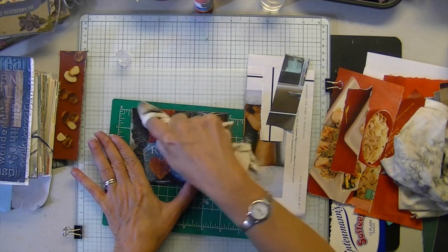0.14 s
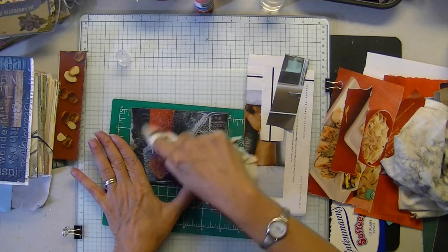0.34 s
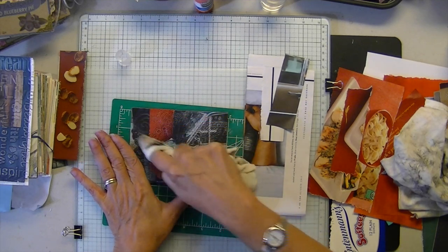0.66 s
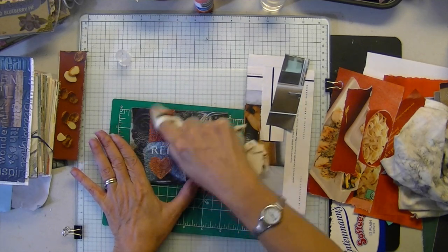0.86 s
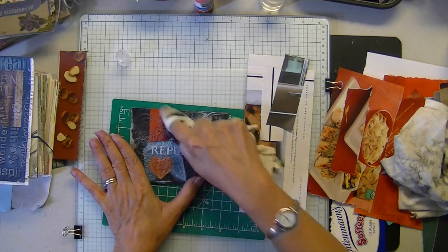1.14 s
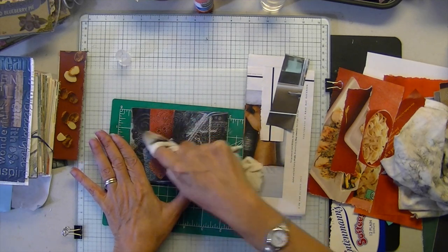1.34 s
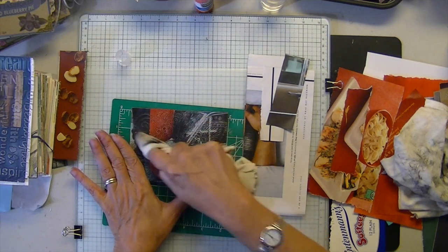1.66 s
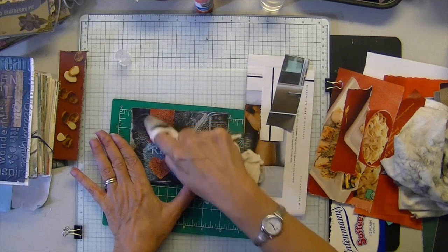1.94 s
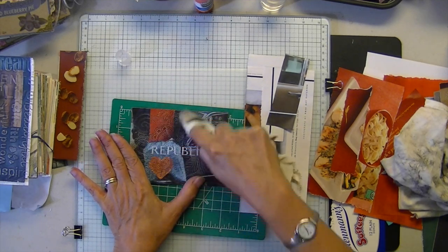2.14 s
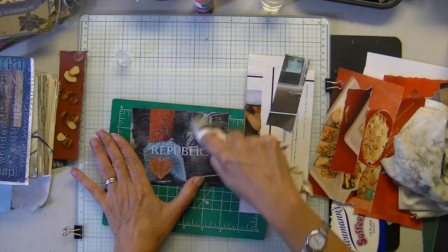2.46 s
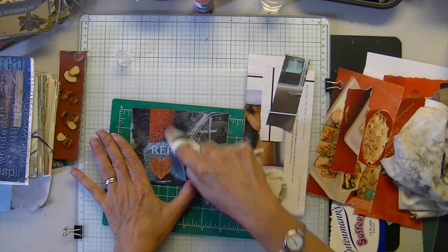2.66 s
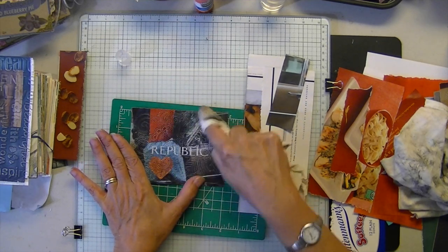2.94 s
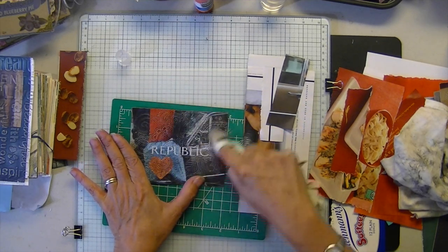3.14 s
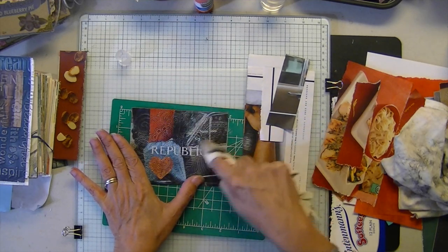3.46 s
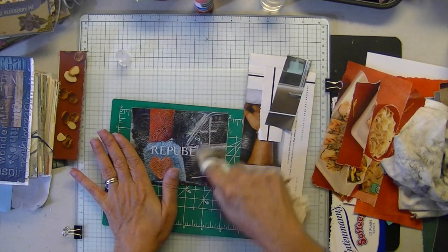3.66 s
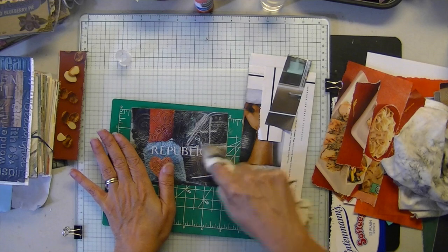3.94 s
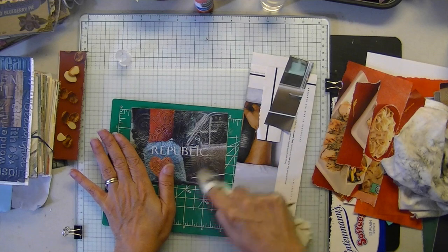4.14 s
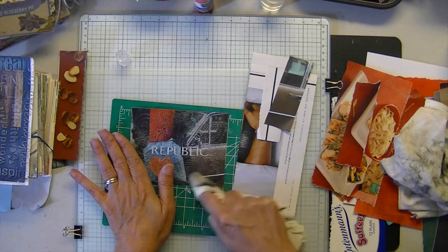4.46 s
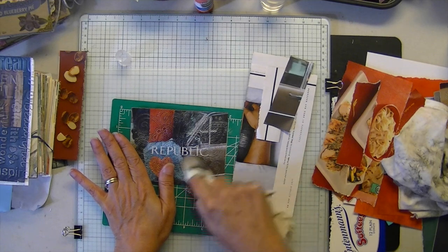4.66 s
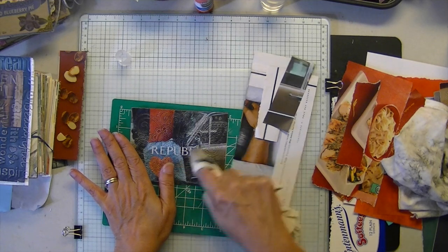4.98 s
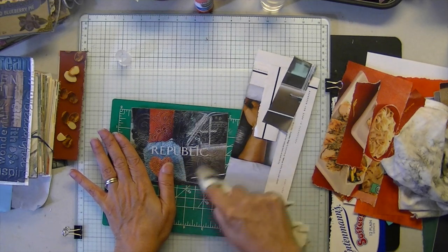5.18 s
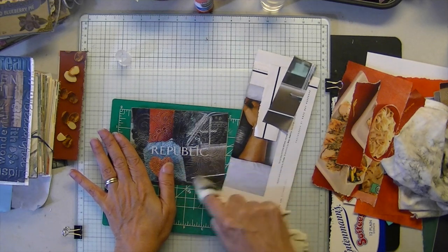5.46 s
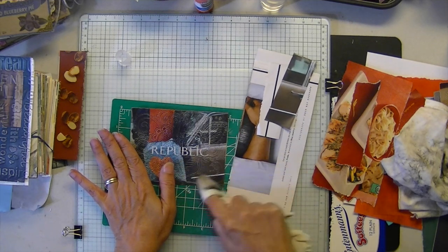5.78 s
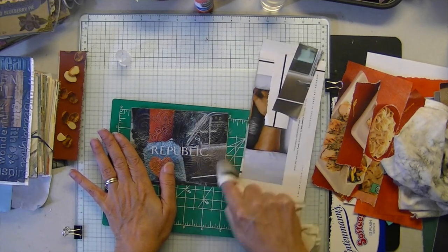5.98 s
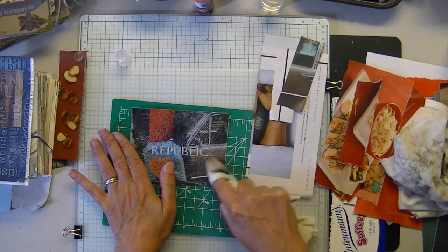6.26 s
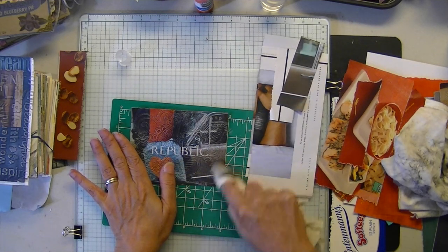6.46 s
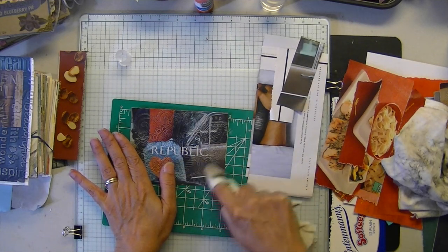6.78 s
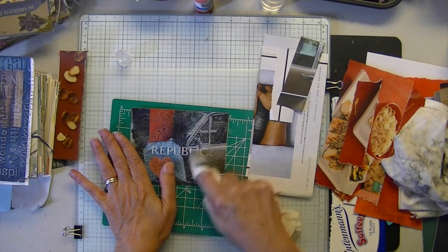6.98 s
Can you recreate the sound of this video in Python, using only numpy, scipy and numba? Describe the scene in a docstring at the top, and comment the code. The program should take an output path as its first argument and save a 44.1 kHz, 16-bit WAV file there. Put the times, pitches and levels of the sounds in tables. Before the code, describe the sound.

Quick, bright, hissing rubs of wet cloth on a slick sheet, six or so a second, with crisp paper cracks over quiet appliance hum.

```python
"""A small room: a damp cloth over a fingertip scrubs to and fro on glossy paper, six or seven strokes a second.
Fibres slip in dense tiny grains: a bright hiss plus two blurred resonances of sheet and cloth that move
from stroke to stroke; now and then a thin whistle or a coarse catch.
Metal at the wrist ticks and the sheet snaps, both as struck decaying modes; the hand bears down in dull swells.
A faint appliance hum of sines and banded air noise lie below."""
import sys
import numpy as np
from scipy import signal
from scipy.io import wavfile
from scipy.ndimage import uniform_filter1d
from numba import njit

SR = 44100
rng = np.random.default_rng(int(sys.argv[2]) if len(sys.argv) > 2 else 0)


def dump(signal):
    """Clip the signal to [-1, 1] and save it as 16-bit WAV at the path in sys.argv[1]."""
    limited = np.clip(np.atleast_2d(signal).T, -1, 1)
    pcm = np.round(limited * 32767).astype(np.int16)
    wavfile.write(sys.argv[1], SR, pcm)


N = 314080

# mean slip rate; size unit of the exponential spread
SLIPS_PER_S, SLIP_SPREAD_DB = 4000, 0.5
HISS_WIDTH_HZ, RASP_WIDTH_HZ, SCUFF_WIDTH_HZ = 1800, 600, 300   # of each of two passes
HISS_BROAD_RE_RESONANCE_DB = 1
# floors between strokes, before the turn drag
REST_HISS_DB, REST_RASP_DB, REST_SCUFF_DB = -79, -79.5, -78.5
GLIDE_S = 0.04   # a glide runs this long either side of mid-stroke
# table top under the scuff: level before following, share of the scuff's dB swing
TABLE_DB, TABLE_FOLLOWS, TABLE_LOW_HZ, TABLE_HIGH_HZ = -67.5, 0.33, 430, 1260
SNAGS_PER_S, SNAG_MEAN_DB, SNAG_DECAY_S = 250, -8, 0.002   # mean jump re steady grip
WHISTLE_T60_S, WHISTLE_EDGE_S = 0.012, 0.012   # t60 of one pass
WHISTLE_FLICKER_DB, WHISTLE_FLICKER_HZ = 2.5, 40
CATCH_SIGMA_S, CATCH_T60_CYCLES = 0.0099, 11
RISE_S = 0.00088   # from first contact to full blow
SNAP_LOW_T60_S = 0.008
RUSTLE_DB, RUSTLE_T60_S, RUSTLE_LOW_HZ, RUSTLE_HIGH_HZ = -21.5, 0.094, 2200, 11100   # level re snap
VALLEY_LOW_HZ, VALLEY_HIGH_HZ = 3750, 4600   # the sheet is dead between low pop and crack
PUSH_SIGMA_S, PUSH_T60_S = 0.019, 0.018
AIR_DB = -61
ROOM_BASS_T60_S, ROOM_DB, WALL_CUT_HZ = 0.2, -15.5, 8100
MIC_LOW_HZ, CUTOFF_HZ = 132, 15850

# strokes of the cloth: start_s, attack_s, hold_s, release_s,
#  hiss_db, hiss_hz (mid-stroke), hiss_glide_hz_per_s, top_re_hiss_db,
#  rasp_lag_s, rasp_re_hiss_db, rasp_hz, rasp_glide_hz_per_s, rasp_broad_re_resonance_db,
#  scuff_lag_s, scuff_re_hiss_db, scuff_hz, scuff_broad_re_resonance_db
STROKES = [(0.009, 0.012, 0.12, 0.011, -58.5, 10000, 8813, -14, -0.092, -6, 5400, -1800, -4, -0.033, -6, 1720, 0),
           (0.11, 0.0098, 0.0037, 0.016, -36, 9800, 2007, -15, -0.015, -3, 5750, 7204, 7, 0.011, -3.5, 1730, 3.5),
           (0.286, 0.017, 0.0092, 0.013, -40.5, 8700, -32300, -8, 0.021, -4.5, 5480, 304, 0, 0.029, -10, 3470, 2),
           (0.425, 0.013, 0.0027, 0.02, -35, 10600, -26400, -10, -0.0033, -3.5, 5800, 7200, 2, -0.011, -10, 3570, -2.5),
           (0.585, 0.0044, 0, 0.029, -39.5, 9800, 29200, -7, 0.019, -12.5, 6170, 5305, 16, 0.01, -15, 2760, 11),
           (0.8, 0.0083, 0.017, 0.013, -29.5, 10800, 18314, -7, -0.0022, -4.5, 5200, 26000, 8.5, 0.0097, -7.5, 2080, -3),
           (0.974, 0.011, 0.0, 0.025, -31.5, 9600, 19276, -11, 0.0045, -13.5, 6300, -10200, 2, -0.0072, -19.5, 3160, 11),
           (1.143, 0.016, 0.0024, 0.013, -36, 10600, 8690, -8, -0.0046, 0.5, 5070, 18000, 2, 0.0069, -5, 1860, 2),
           (1.344, 0.02, 0.012, 0.015, -35, 10400, 2700, -16.4, 0.007, -19.5, 5400, -13300, -2, -0.0052, -14.5, 3180, 6),
           (1.489, 0.028, 0.0027, 0.013, -40.5, 9600, -18200, -7, -0.0064, -3, 6170, 5094, 7, 0.0055, -5, 1990, 2),
           (1.671, 0.019, 0.0, 0.019, -33.5, 10450, -1500, -15, 0.015, -15, 4470, -2200, 2, 0.0073, -17, 3400, 1),
           (1.768, 0.013, 0.078, 0.012, -44.5, 10700, -1300, -12, 0.014, -2.5, 5300, 9202, 8, 0.055, -2, 2100, 6),
           (2.006, 0.018, 0.0, 0.012, -37.5, 9200, -27900, -12, 0.0023, -15, 7150, -15800, 12, 0.014, -12.5, 2880, 14),
           (2.094, 0.041, 0.029, 0.019, -51, 10100, -2900, -8, 0.02, -2, 4360, 4606, 2, 0.063, -3.5, 2160, 6),
           (2.208, 0.024, 0.00074, 0.011, -39.5, 8800, -13200, -13, -0.0029, -3, 5200, 2136, 10, -0.029, -13.5, 2410, 36),
           (2.34, 0.0086, 0.029, 0.013, -40, 10700, 24693, -9, -0.01, -13.5, 6100, 1709, 3, 0.0037, -8, 2520, 5),
           (2.41, 0.023, 0.099, 0.0046, -57.5, 9100, -9300, -4, -0.013, 0, 4560, 5102, 3.5, -0.0095, -7, 2200, 7),
           (2.525, 0.0078, 0.011, 0.014, -35.5, 9700, -15800, -10.4, -0.015, -0.5, 5550, 19102, -6, 0.0067, -10, 2750, 6),
           (2.717, 0.026, 0.0084, 0.024, -41, 9900, 13117, -6.5, -0.00073, -5, 6400, 302, 37, 0.018, -6.5, 2200, 5),
           (2.867, 0.027, 0.048, 0.013, -44, 9900, -12200, -10, -0.013, -1.5, 5800, 17120, -1, -0.0037, -8, 1820, 3),
           (3.05, 0.0074, 0.046, 0.018, -38.5, 9800, -12500, -6.5, 0.0046, -4, 6220, -2500, -1.5, 0.013, -7, 3030, 10),
           (3.207, 0.013, 0.005, 0.019, -33.5, 9400, -2400, -6, -0.0073, -3.5, 5900, 9912, -1, -0.018, -15.5, 1700, 18),
           (3.292, 0.022, 0.0, 0.022, -49.5, 9500, -3400, -5, -0.0087, -13, 5870, 5884, 5, -0.054, -2, 1850, 3),
           (3.43, 0.0049, 0.06, 0.0064, -36.5, 8800, -7500, -9, 0.0077, -8, 6120, -1600, -9, 0.019, -12.5, 1690, 4),
           (3.582, 0.023, 0.014, 0.011, -34.5, 10700, -14100, -8, 0.0064, -8.5, 7300, 7296, -2, 0.031, -9, 3390, 3.5),
           (3.688, 0.0049, 0.1, 0.0099, -35.5, 10550, 4687, -12, 0.037, -4.5, 5700, 895, 9, 0.014, -17, 1700, 6),
           (3.932, 0.016, 0.00061, 0.0075, -38, 10100, -1800, -8, 0.0048, -10.5, 5480, 7702, 11, -0.0033, -18.5, 2300, 6),
           (4.044, 0.0087, 0.072, 0.011, -40, 10400, 7176, -10, 0.0022, -9, 7050, 13095, 7, 0.015, -15.5, 3210, 0),
           (4.223, 0.0053, 0.058, 0.0072, -39, 10050, -5100, -5.5, -0.0029, -6.5, 7060, 3184, -1, 0.015, -11.5, 1880, 2),
           (4.374, 0.014, 0.076, 0.0093, -44, 10840, 9661, -11, -0.0037, -9, 7350, -1100, 6, 0.009, -12, 3260, -1.5),
           (4.572, 0.0081, 0.043, 0.01, -39.5, 10900, 18196, -11, -0.0048, -6.5, 6880, 9993, -3, -0.0034, -20, 2180, 10),
           (4.752, 0.024, 0.0074, 0.015, -30.5, 10500, -7900, -13, 0.012, -7, 6950, -11800, 4, 0.015, -12.5, 3260, 3),
           (4.949, 0.022, 0.014, 0.014, -42, 10400, 16026, -6, -0.0063, -1, 6420, 1093, -1, -0.0089, -11, 2340, 8),
           (5.09, 0.02, 0.022, 0.019, -35.5, 10500, 4230, -7, 0.00045, -6, 6000, -11800, 36, 0.029, -8.5, 3250, 4.5),
           (5.255, 0.01, 0.0049, 0.024, -33, 10100, 5699, -10, -0.0072, -6, 6600, 2698, 5, -0.0091, -15, 3240, 16),
           (5.399, 0.009, 0.095, 0.0024, -50.5, 10100, -5100, -9, -0.00068, -4, 6260, -6200, 4, 0.021, -7.5, 2400, 0),
           (5.58, 0.012, 0.0057, 0.021, -35.5, 10000, -2300, -8, -0.004, -6.5, 6200, 16191, 8, -0.0096, -14.5, 2800, 17),
           (5.744, 0.0056, 0.048, 0.0096, -40.5, 10500, 2596, -9, 0.012, -5, 6540, -8500, -3.5, 0.017, -13, 2410, 6),
           (5.892, 0.011, 0.089, 0.006, -37.5, 10260, 7205, -9, 0.0075, -7, 4680, -3300, 5, 0.026, -12.5, 1950, 2),
           (6.048, 0.0039, 0.062, 0.0035, -47, 9100, 6423, -10, 0.003, -8.5, 6100, 8500, -2, -0.00048, -11.5, 1850, 20),
           (6.178, 0.0065, 0.044, 0.0084, -38, 10700, 5432, -7, 0.011, -10.5, 5340, 3521, 43, 0.0049, -10.5, 2370, 6),
           (6.313, 0.0085, 0.011, 0.011, -40, 9500, 10298, -5, -0.00073, -10.5, 6440, 8116, 2, -0.035, -14, 1730, 7),
           (6.376, 0.0061, 0.067, 0.0077, -47.5, 10420, -11700, -8, 0.024, -8, 6740, 2798, 2, 0.011, -11.5, 1820, 11),
           (6.513, 0.0046, 0.076, 0.013, -40.5, 10400, -17600, -11, 0.00056, -14.5, 6200, -1200, 5, 0.0025, -15.5, 1800, 11),
           (6.666, 0.01, 0.069, 0.0088, -40.5, 10340, 2506, -13, 0.017, -4, 6840, 14092, -2, 0.018, -9, 3190, -10.5),
           (6.858, 0.0081, 0.017, 0.026, -37.5, 10700, 17697, -8, -0.0063, -9.5, 6580, 7011, -3, 0.014, -11, 2110, 0.5),
           (7.031, 0.0099, 0.032, 0.019, -36.5, 10600, -5400, -8, -0.0036, -5, 5780, 16909, -2, 0.0055, -12.5, 3270, -5.5)]


def cloth_on_sheet():
    """Slipping fibres excite hiss and rasp; each stroke sets their levels, pitches and colours."""
    (hiss_db, hiss_hz, hiss_glide, top_db,
     lag_s, rasp_db, rasp_hz, rasp_glide, broad_db) = np.transpose(STROKES)[4:13]
    hiss_gain, hiss_hz, top_db = strokes(0, hiss_db, REST_HISS_DB, hiss_hz, hiss_glide, top_db)
    rasp_gain, rasp_hz, broad_db = strokes(
        lag_s, hiss_db + rasp_db, REST_RASP_DB, rasp_hz, rasp_glide, broad_db)

    hiss_modes = patchy_modes(8000, 12150, count=18, patchy_db=8)
    hiss = resonant_rub(hiss_hz, HISS_WIDTH_HZ, hiss_modes, HISS_BROAD_RE_RESONANCE_DB, alike=0.82)
    top_modes = patchy_modes(12600, 15600, count=6, patchy_db=4)
    top = stereo(*top_modes, 0.49) * from_db(top_db) / np.sqrt(2)
    rasp_modes = patchy_modes(5000, 7600, count=10, patchy_db=6)
    rasp = resonant_rub(rasp_hz, RASP_WIDTH_HZ, rasp_modes, broad_db, alike=0.65)
    return hiss_gain * (hiss + top) + rasp_gain * rasp


def cloth_scuff():
    """Loose cloth drags a little behind or ahead of the fingertip; the table top murmurs under it."""
    columns = np.transpose(STROKES)
    hiss_db, (lag_s, scuff_db, scuff_hz, broad_db) = columns[4], columns[13:]
    gain, scuff_hz, broad_db = strokes(lag_s, hiss_db + scuff_db, REST_SCUFF_DB, scuff_hz, 0, broad_db)
    broad = patchy_modes(1607, 4210, count=10, patchy_db=5.5)
    scuff = gain * resonant_rub(scuff_hz, SCUFF_WIDTH_HZ, broad, broad_db, alike=0.46)
    table_modes = patchy_modes(TABLE_LOW_HZ, TABLE_HIGH_HZ, count=6, patchy_db=3.5)
    table = stereo(*table_modes, 0.22) / np.sqrt(2)
    return scuff + from_db(TABLE_DB) * rms_one(gain) ** TABLE_FOLLOWS * table


def strokes(lag_s, level_db, rest_db, hz, glide_hz, colour_db):
    """Strokes swell, hold and fade; powers add, pitch and colour are means weighted by stroke power."""
    # how much the cloth still drags at the turns: time_s, drag_re_rest_db
    turn_drag = [(0.2, -4), (0.72, 12), (1.23, 4.5), (2.43, 6), (2.8, 9), (2.99, -14), (3.15, 2),
                 (3.38, -14), (3.55, 8.5), (5.5, 1), (5.7, -18), (5.9, 7), (7.0, 6)]
    start_s, attack_s, hold_s, release_s = np.transpose(STROKES)[:4, :, None]
    lag_s = np.reshape(lag_s, (-1, 1))
    t = np.arange(0, N + 32, 32) / SR
    since = t - start_s - lag_s
    hold_s = np.maximum(hold_s - np.maximum(lag_s, 0), 0)   # a late layer holds for less
    rising = np.exp(np.clip(-since / np.maximum(attack_s, 0.002), -9, 40))
    fading = np.exp(np.clip((since - hold_s) / np.maximum(release_s, 0.002), -9, 40))
    power = (from_db(level_db)[:, None] / (1 + rising + fading)) ** 2
    total = power.sum(axis=0)

    glide = np.reshape(glide_hz, (-1, 1)) * np.clip(since - hold_s / 2, -GLIDE_S, GLIDE_S)
    pitch = hz[:, None] + glide
    floor_db = rest_db + np.interp(t, *np.transpose(turn_drag))
    gain = np.sqrt(total + from_db(2 * floor_db))
    tracks = gain, (pitch * power).sum(axis=0) / total, colour_db @ power / total
    return [np.interp(np.arange(N) / SR, t, track) for track in tracks]


def slips():
    """Fibres catch and let go: dense clicks of uneven size on fine noise; two independent streams."""
    sizes = from_db(SLIP_SPREAD_DB * np.minimum(rng.exponential(1, (2, N)), 5))
    sizes = sizes * rng.choice([-1, 1], (2, N))
    born = rng.random((2, N)) < SLIPS_PER_S * from_db(3 * drift(60)) / SR
    return rms_one(sizes * born) + 1.12 * rng.standard_normal((2, N))


def resonant_rub(centre_hz, width_hz, broad, broad_db, alike):
    """Slips twice through a moving resonance, over a broad part; rms about 1."""
    r = np.exp(-np.pi * width_hz / SR)
    two_r_cos = 2 * r * np.cos(2 * np.pi * centre_hz / SR)
    once = moving_resonance(slips(), two_r_cos, r)
    peak = steadied(moving_resonance(once, two_r_cos, r))
    mid, side = (peak + from_db(broad_db) * broad) / np.sqrt(1 + from_db(2 * broad_db))
    return stereo(mid, side, alike) / np.sqrt(2)


@njit
def moving_resonance(x, two_r_cos, r):
    """Two-pole band-pass whose centre changes every sample."""
    y = np.zeros_like(x)
    for i in range(2, x.shape[1]):
        y[:, i] = x[:, i] - x[:, i - 2] + two_r_cos[i] * y[:, i - 1] - r * r * y[:, i - 2]
    return y


def patchy_modes(low_hz, high_hz, count, patchy_db):
    """Many modes side by side, each waxing and waning as the contact wanders; rms about 1."""
    source, out = slips(), 0
    for k, hz in enumerate(np.geomspace(low_hz, high_hz, count)):
        width_hz = 2.32 * hz * np.log(high_hz / low_hz) / count
        t60_s = np.log(1000) / np.pi / width_hz
        mode = signal.lfilter([1, 0, -1], [1], ring(source, hz, t60_s))
        out = out + rms_one(mode) * from_db(patchy_db * drift(11.5)) * (-1) ** k
    return steadied(band_pass(out, 0.92 * low_hz, 1.1 * high_hz, order=4))


def snags():
    """A thread hooks: grip jumps and dies back in milliseconds; mean power 1."""
    hooked = (rng.random(N) < SNAGS_PER_S / SR) * from_db(SNAG_MEAN_DB) * rng.random(N) * 2
    jumps = signal.lfilter([1], [1, -np.exp(-1 / (SNAG_DECAY_S * SR))], hooked)
    return rms_one(1 + jumps)


def whistles():
    """Damp fibres sing unevenly for a moment: noise twice through one narrow resonance."""
    # thin whistles: start_s, length_s, level_db (before flicker), pitch_hz
    whistle_table = [(0.662, 0.16, -61, 4000), (1.034, 0.045, -67, 4400), (2.16, 0.063, -58, 2320),
                     (4.3, 0.035, -57, 4530), (4.698, 0.053, -59.5, 3360), (5.205, 0.077, -54.5, 4840),
                     (5.784, 0.022, -51.5, 2400), (6.057, 0.099, -61, 1880), (6.14, 0.33, -67, 1870),
                     (3.935, 0.033, -64.5, 5500)]
    out, t = np.zeros(N), np.arange(13230) / SR
    noise = rng.standard_normal((len(whistle_table), len(t)))
    for (start_s, length_s, level_db, hz), rub in zip(whistle_table, noise):
        swell = np.clip(np.minimum(t, length_s - t) / WHISTLE_EDGE_S + 0.5, 0, 1)
        swell = swell * np.clip(t / WHISTLE_EDGE_S, 0, 1)
        tone = rms_one(ring(ring(rub, hz, WHISTLE_T60_S), hz, WHISTLE_T60_S))
        at = round(start_s * SR)
        out[at:at + len(t)] += from_db(level_db) * swell * tone
    return out * from_db(WHISTLE_FLICKER_DB * np.minimum(drift(WHISTLE_FLICKER_HZ), 1))


def catches():
    """The cloth catches and rasps briefly: spiky noise through one blunt resonance."""
    # catches: centre_s, level_db (before the swell), pitch_hz
    catch_table = [(1.313, -58, 11200), (1.343, -59, 3230), (5.94, -46.5, 4600), (5.975, -45.5, 3940),
                   (6.194, -48.5, 5200)]
    out, t = np.zeros(N), np.arange(-882, 882) / SR
    noise = rng.standard_normal((len(catch_table), len(t))) ** 3   # cubing makes it spiky
    for (centre_s, level_db, hz), rub in zip(catch_table, noise):
        at = round(centre_s * SR) - len(t) // 2
        rasp = rms_one(above(ring(rub, hz, CATCH_T60_CYCLES / hz), 0.84 * hz))
        out[at:at + len(t)] += from_db(level_db) * rasp * np.exp(-0.5 * (t / CATCH_SIGMA_S) ** 2)
    return out


def sheet_snaps():
    """A crack in the sheet's high modes, a low pop pitched by where it buckles, a dying rustle."""
    # snaps: contact_s, level_db, top_re_level_db, low_re_level_db, low_hz (pop), left_re_right_db
    snaps = [(0.132, -45, -16, -5, 1700, 9), (0.473, -41, -27, 4.5, 1850, 1), (0.659, -42, -30, 5, 3520, 5),
             (0.839, -40.5, -22, 14.5, 1840, 5), (1.163, -33, -31, 1.5, 1820, 10),
             (1.4996, -41.5, -7, 11, 1940, 1), (1.839, -39.5, -14, 12.5, 1840, 4),
             (3.6294, -42.5, -30, 8.5, 2770, 11), (4.1102, -17.5, -32, -15, 3230, 1),
             (4.447, -17.5, -17.5, -12, 3100, -3), (5.117, -27.5, -12, -17, 3150, -10),
             (5.4633, -17.5, -16.5, -3, 2960, 12.5), (5.8612, -54.5, -24, 16.5, 1770, -2),
             (6.738, -37, -20, 9.5, 2980, 5), (7.1144, -15.5, -17, -1, 2960, 4)]
    # main crack modes of the sheet: pitch_hz, level_re_snap_db, t60_s
    sheet_modes = [(5480, -7.5, 0.0049), (7480, -12.5, 0.014)]
    # top crack modes of the sheet: pitch_hz, level_re_top_db, t60_s
    sheet_top_modes = [(8800, -3, 0.0073), (10550, 12, 0.0047)]
    contact_s, level_db, top_db, low_db, low_hz, pan_db = np.transpose(snaps)
    crack = struck(contact_s, level_db, pan_db, sheet_modes, uneven_db=1)
    crack = crack + struck(contact_s, level_db + top_db, pan_db, sheet_top_modes, uneven_db=1)
    out, after = above(crack, 2500), np.arange(4000)

    rustle_noise = rng.standard_normal((len(snaps), 2, len(after)))
    rustle_fade = from_db(RUSTLE_DB - 60 * after / SR / RUSTLE_T60_S)
    rustles = band_pass(rustle_noise, RUSTLE_LOW_HZ, RUSTLE_HIGH_HZ, order=2) * rustle_fade
    for s, db, low, hz, pan, rustle in zip(contact_s, level_db, low_db, low_hz, pan_db, rustles):
        at = round((s + RISE_S) * SR)
        tone = above(ring(after == 0, hz, SNAP_LOW_T60_S), 1.137 * hz)
        pop = from_db(low + np.outer([0.5, -0.5], pan)) * tone
        out[:, at:at + len(after)] += from_db(db) * (pop + rustle)[:, :N - at]
    valley = signal.butter(2, [VALLEY_LOW_HZ, VALLEY_HIGH_HZ], "bandstop", fs=SR, output="sos")
    return signal.sosfilt(valley, out)


def wrist_metal():
    """Short bright ticks of strap links, too small to radiate bass."""
    # ticks: contact_s, level_db, left_re_right_db, upper_modes_re_level_db
    ticks = [(0.89, -53.5, -10, -10), (1.256, -66.5, -8, 4), (1.5958, -62, -7, 11), (1.906, -42.5, -6, 1.5),
             (2.2794, -65, -8, -17), (2.611, -51.5, 5.5, -6)]
    # modes of the links, three lower then two upper: pitch_hz, level_re_tick_db, t60_s
    metal_modes = [(7200, 12, 0.011), (7850, 11, 0.011), (9400, 19, 0.01), (10400, 15, 0.009),
                   (12100, 12, 0.006)]
    contact_s, level_db, pan_db, upper_db = np.transpose(ticks)
    lower = struck(contact_s, level_db, pan_db, metal_modes[:3], uneven_db=1.5)
    upper = struck(contact_s, level_db + upper_db, pan_db, metal_modes[3:], uneven_db=1.5)
    return band_pass(lower + upper, 6200, 13200, order=4)


def struck(contact_s, levels_db, pans_db, modes, uneven_db):
    """Every blow sets every mode ringing with a strength of its own."""
    at, out = np.round((np.array(contact_s) + RISE_S) * SR).astype(int), np.zeros((2, N))
    chance = rng.normal(0, 1, (len(at), len(modes)))
    sides = from_db(np.outer([0.5, -0.5], pans_db))
    for k, (hz, mode_db, t60_s) in enumerate(modes):
        clicks = np.zeros((2, N))
        clicks[:, at] = sides * from_db(levels_db + mode_db + uneven_db * chance[:, k]) * (-1) ** k
        out += ring(clicks, hz, t60_s)
    return out


def table_pushes():
    """Soft swells of dull resonant noise where the hand bears down on the table top."""
    # pushes: centre_s, level_db (before the swell), pitch_hz
    pushes = [(2.355, -61, 1150), (2.71, -60, 720), (3.6, -65.5, 300), (3.75, -60.5, 740),
              (3.751, -62, 1290), (4.249, -64, 245), (4.8, -62.5, 1000), (5.43, -65, 1080),
              (5.78, -64.5, 720), (5.88, -61, 484), (6.309, -65.5, 283)]
    out, t = np.zeros(N), np.arange(-2205, 2205) / SR
    noise = rng.standard_normal((len(pushes), len(t)))
    for (centre_s, level_db, hz), rub in zip(pushes, noise):
        at = round(centre_s * SR) - len(t) // 2
        dull = rms_one(above(ring(rub, hz, PUSH_T60_S), hz))
        out[at:at + len(t)] += from_db(level_db) * dull * np.exp(-0.5 * (t / PUSH_SIGMA_S) ** 2)
    return out


def room(x):
    """Reflections: eight feedback delays a side, duller on every round, stepped block by block."""
    out, dull = np.zeros((2, N)), np.exp(-2 * np.pi * WALL_CUT_HZ / SR)
    for k, lag in enumerate((rng.uniform(0.0055, 0.027, 16) * SR).astype(int)):
        loop, gain, state = x.copy(), from_db(-60 * lag / SR / ROOM_BASS_T60_S), [0.]
        for i in range(lag, N, lag):
            back, state = signal.lfilter([gain * (1 - dull)], [1, -dull], loop[i - lag:i], zi=state)
            loop[i:i + lag] += back[:N - i]
        out[k % 2] += (loop - x) * (-1) ** (k // 2)
    return out


def hum():
    """Tones of a distant appliance: nearly steady sines, reaching the two microphones with a lag."""
    # hum tones: pitch_hz, level_db (mean of both sides), left_lead_rad
    hum_tones = [(159.7, -84, -1), (318.5, -77.5, 1.5), (458, -69.5, 1), (720, -67, 1.62), (1330, -74.5, 4),
                 (1430, -79, 1.3)]
    t, out = np.arange(N) / SR, np.zeros((2, N))
    for hz, level_db, lead_rad in hum_tones:
        phase = 2 * np.pi * hz * t + 0.4 * drift(3.6) + np.outer([0.5, -0.5], lead_rad)
        out += np.sqrt(2) * from_db(level_db + 1.1 * drift(3)) * np.sin(phase)
    return out * from_db([[0.7], [-0.7]])   # left a little louder


def air():
    """Ventilation noise in third-octave bands, breathing slightly, stronger on the left in the bass."""
    # lower air spectrum: freq_hz, relative_density_db
    air_low = [(70, -9), (95, -53), (120, -7.5), (190, -18), (260, -2), (500, -2), (1000, -7.5)]
    # treble air spectrum: freq_hz, relative_density_db
    air_top = [(2700, -11), (5500, -22), (10000, -30), (15800, -45)]
    # likeness of the two sides: freq_hz, likeness (-1 opposed to 1 same)
    air_likeness = [(60, 0.33), (200, 1), (400, -0.95), (700, -0.33), (1300, -0.62), (2400, -0.09),
                    (10000, 0.83)]
    # balance of the air noise: freq_hz, left_re_right_db
    left_louder = [(100, 7), (400, 0), (1300, 2), (10000, -1.5)]
    out, edges, white = 0, np.geomspace(25, 17000, 28), rng.standard_normal((2, 2, N))
    together = drift(3.4)
    for k, (low, high) in enumerate(zip(edges, edges[1:])):
        mid, side = band_pass(white[k % 2], low, high, order=2)
        hz = np.sqrt(low * high)
        breath_db = 0.5 * drift(2.5) + 1.8 * together
        pan_db = np.outer([0.5, -0.5], at_hz(left_louder, hz))
        gain_db = at_hz(air_low + air_top, hz) + breath_db + pan_db
        out = out + from_db(gain_db) * stereo(mid, side, at_hz(air_likeness, hz))
    return from_db(AIR_DB) * rms_one(out)


def from_db(db):
    """Gain of a level."""
    return 10 ** (np.asarray(db) / 20)


def rms_one(x):
    """Scaled to unit power."""
    return x / np.sqrt(np.mean(x ** 2) + 1e-20)


def steadied(x):
    """Slow level changes divided out over 0.1 s, both rows alike."""
    return x / np.sqrt(uniform_filter1d(np.mean(x ** 2, axis=0), size=4410))


def at_hz(points, hz):
    """A spectrum table read on a log-frequency axis."""
    table_hz, values = np.transpose(points)
    return np.interp(np.log(hz), np.log(table_hz), values)


def drift(rate_hz):
    """Slow chance: noise at every 40th sample through a double one-pole low-pass; spread 1."""
    r = np.exp(-80 * np.pi * rate_hz / SR)
    slow = signal.lfilter([1], [1, -2 * r, r * r], rng.standard_normal(N // 40 + 2002))[2000:]
    return np.interp(np.arange(N) / 40, np.arange(len(slow)), rms_one(slow))


def ring(clicks, hz, t60_s):
    """A unit click sets a decaying sine of height 1 ringing."""
    r, w = from_db(-60 / (t60_s * SR)), 2 * np.pi * hz / SR
    return signal.lfilter([0, np.sin(w)], [1, -2 * r * np.cos(w), r * r], clicks + 1e-18)


def stereo(mid, side, alike):
    """Left and right from a shared and an opposed part."""
    alike = np.clip(alike, -1, 1)
    return np.sqrt(1 + alike) * mid + np.sqrt(1 - alike) * side * [[1], [-1]]


def above(x, hz):
    """High-pass."""
    return signal.sosfilt(signal.butter(4, hz, "high", fs=SR, output="sos"), x)


def band_pass(x, low_hz, high_hz, order):
    """Butterworth band-pass."""
    return signal.sosfilt(signal.butter(order, [low_hz, high_hz], "band", fs=SR, output="sos"), x)


def scene():
    """Hand and paper close below the microphones, room and hum around."""
    # where the cloth works: time_s, left_re_right_db
    hand_place = [(0, 2), (2.4, 0.5), (3.2, 0), (7.12, 0)]
    pan_db = np.interp(np.arange(N) / SR, *np.transpose(hand_place))
    cloth = snags() * cloth_on_sheet() + cloth_scuff() + whistles() + catches()
    cloth = cloth * from_db(np.outer([0.5, -0.5], pan_db))
    table = cloth + wrist_metal() + sheet_snaps() + table_pushes()
    return table + from_db(ROOM_DB) * room(table.mean(axis=0)) + hum() + air()


def record(dry):
    """The microphones lose the bass; the top is cut steeply."""
    steep = signal.ellip(12, 0.5, 75, CUTOFF_HZ, fs=SR, output="sos")
    return signal.sosfilt(steep, above(dry, MIC_LOW_HZ))


dry = scene()
out = record(dry)
dump(out)
```